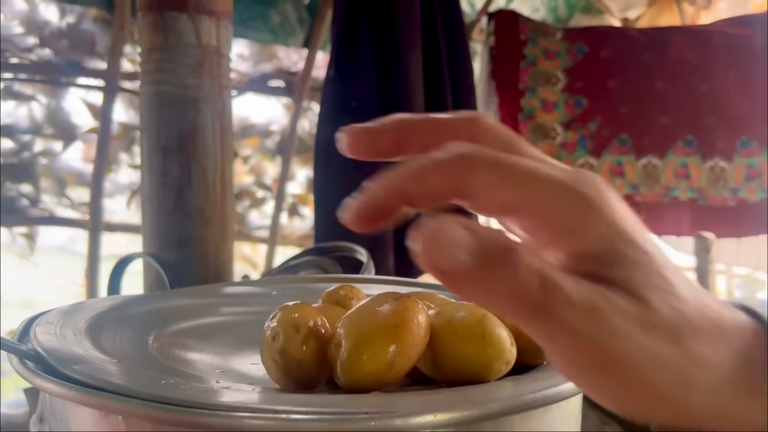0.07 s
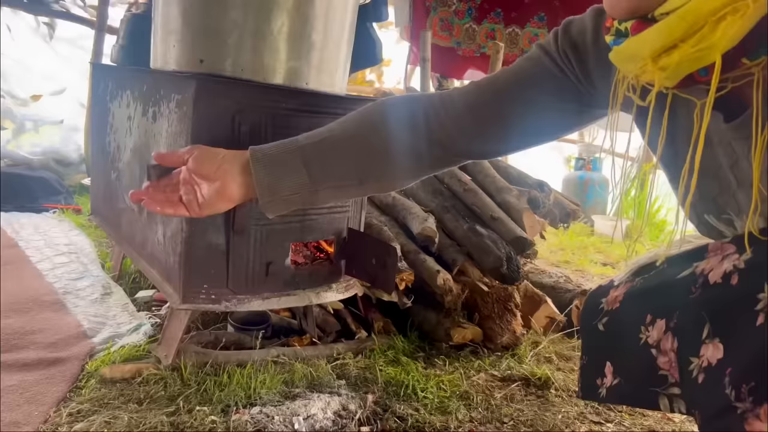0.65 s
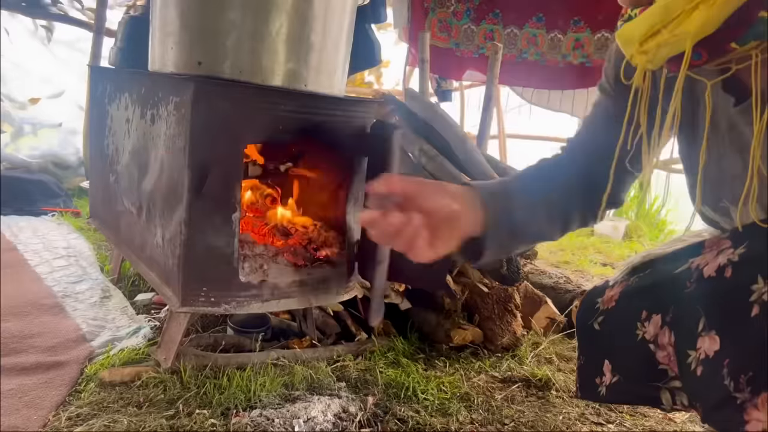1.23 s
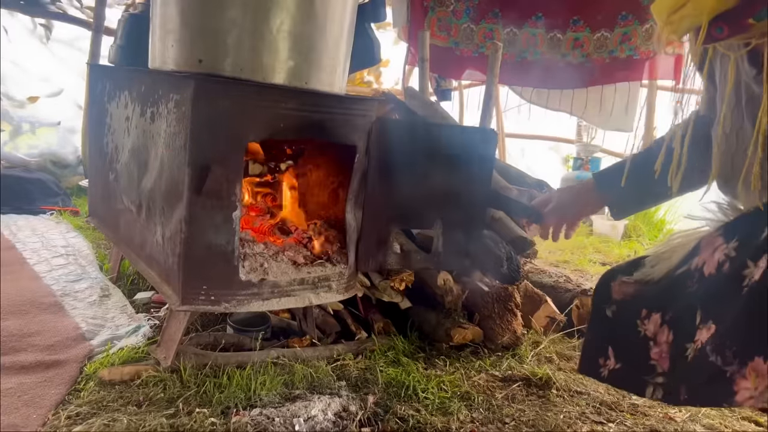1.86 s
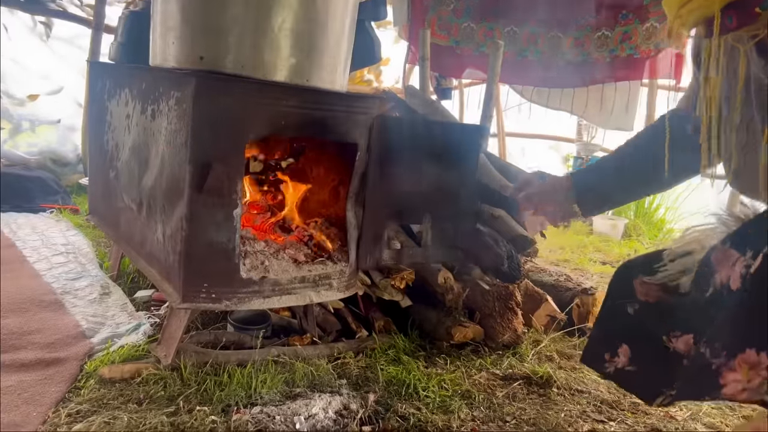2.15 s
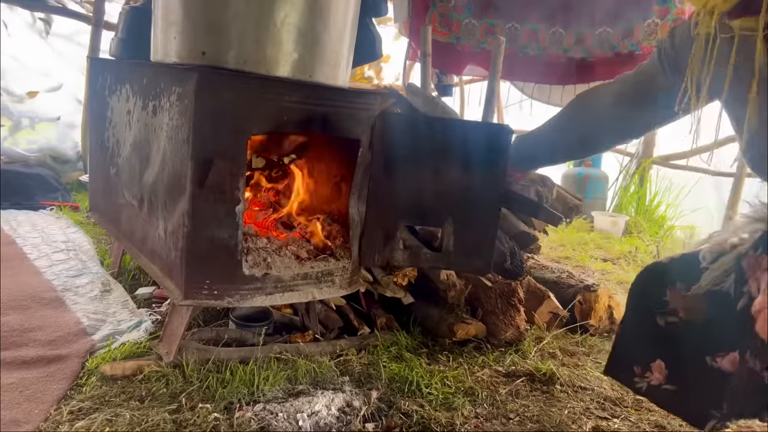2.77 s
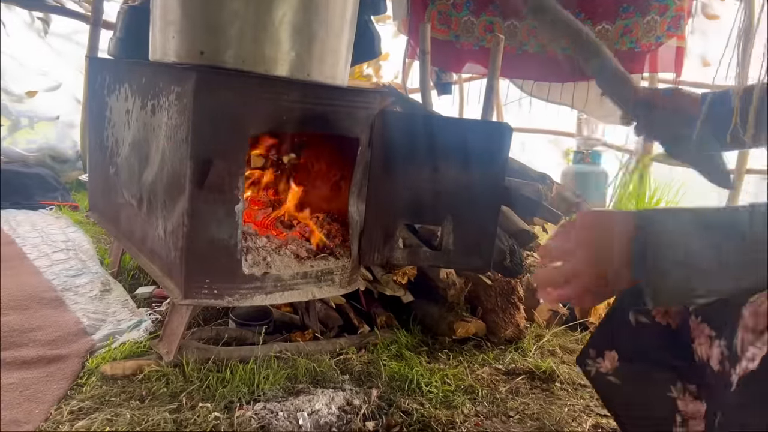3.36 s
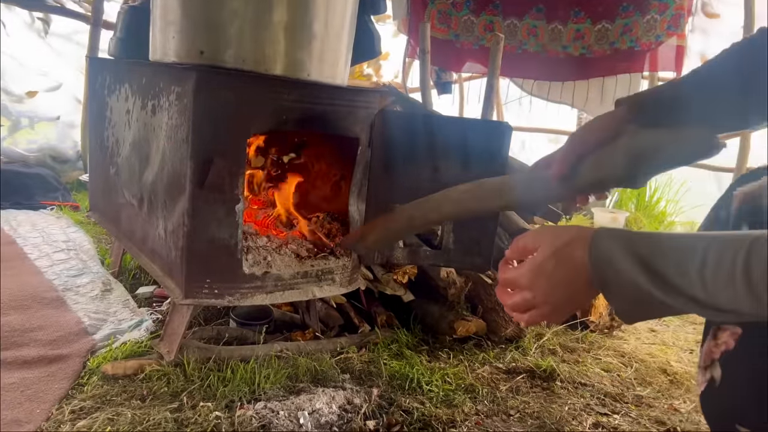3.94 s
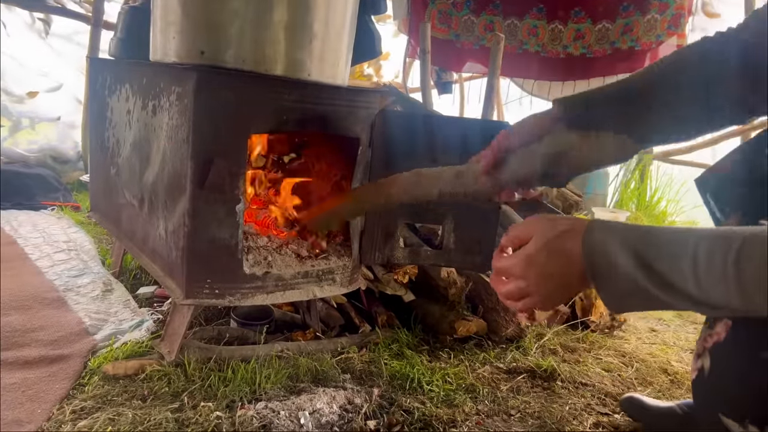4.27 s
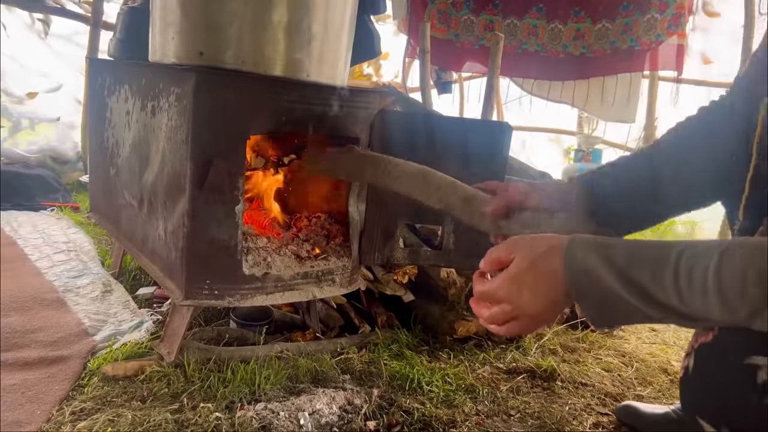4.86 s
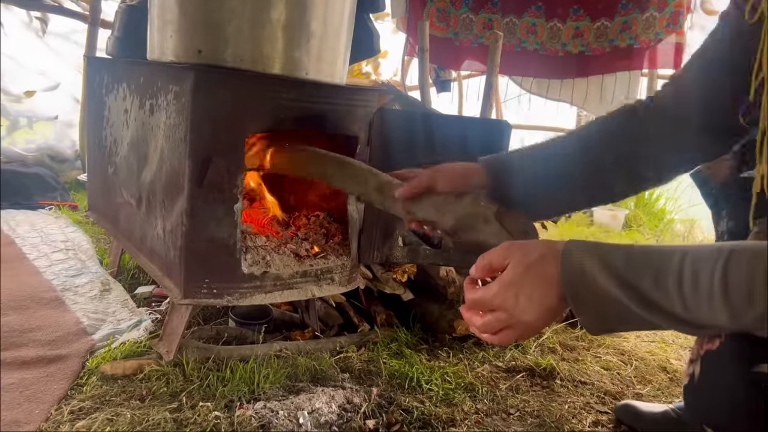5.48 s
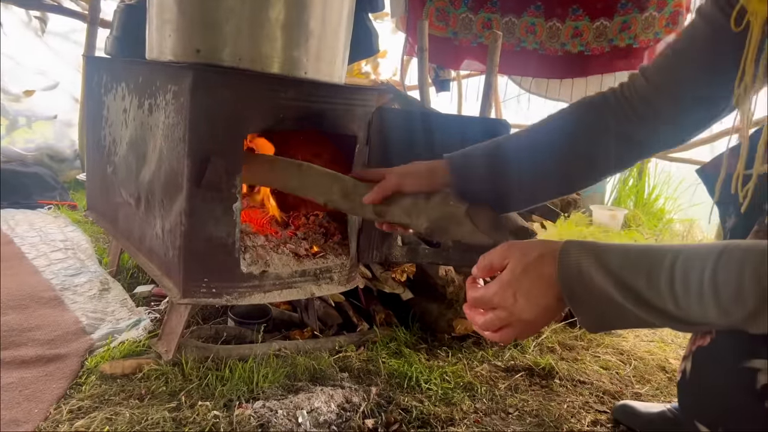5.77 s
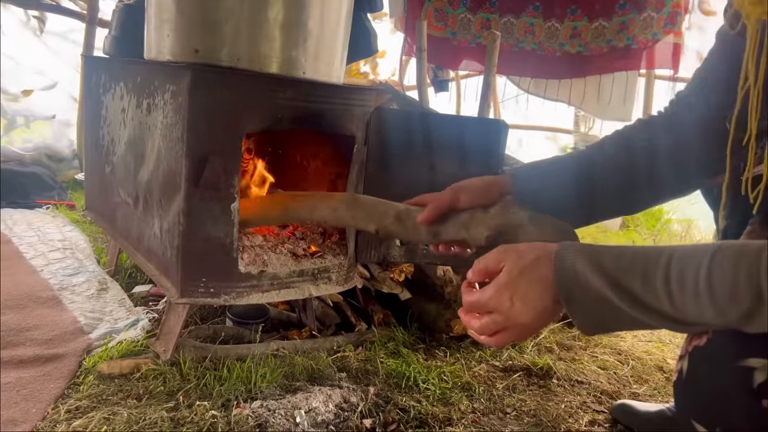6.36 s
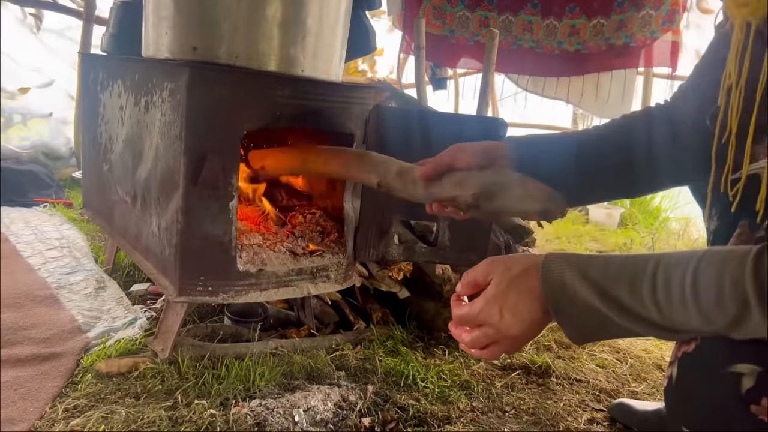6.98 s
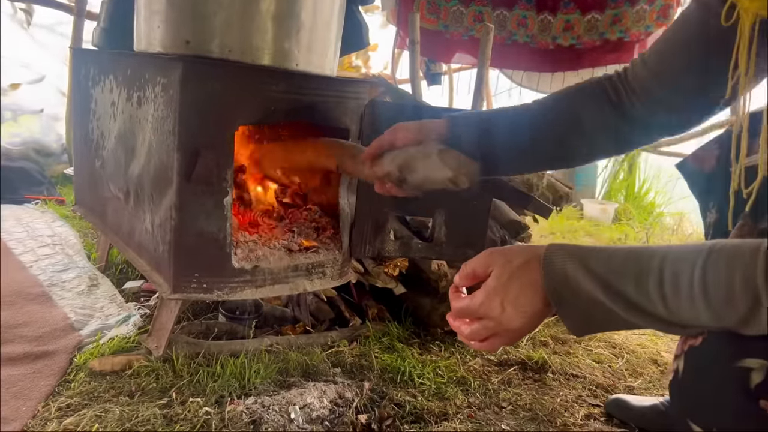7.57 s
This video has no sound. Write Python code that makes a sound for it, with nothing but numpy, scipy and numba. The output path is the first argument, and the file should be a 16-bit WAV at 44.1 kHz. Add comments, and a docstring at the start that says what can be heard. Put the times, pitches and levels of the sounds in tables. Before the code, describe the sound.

Light rain patters on a shelter as a stove door clanks open and firewood is clattered about, then shoved into the rumbling fire.

```python
"""A small wood stove is fed: its sheet-metal door swings open and a stick is picked from the woodpile.
Sticks knock together, then a long one is shoved into the fire: the firebox booms, coals crunch and
bark scrapes. The fire rumbles as it draws air, and its embers tick more once it is poked.
A sleeve swishes with each reach of the arm, and light rain patters on the shelter overhead."""
import sys
import numpy as np
from scipy import signal
from scipy.fft import rfft, irfft, next_fast_len
from scipy.io import wavfile
from numba import njit

SR = 44100
rng = np.random.default_rng(int(sys.argv[2]) if len(sys.argv) > 2 else 0)


def wrap_up_sound(samples):
    """Save the sound to the file named by the first command line argument, as 16-bit audio."""
    columns = np.atleast_2d(samples).T
    # keep every value between -1 and 1, then stretch to whole-number steps
    tamed = np.clip(columns, -1, 1)
    steps = np.round(tamed * 32767).astype(np.int16)
    wavfile.write(sys.argv[1], SR, steps)


N = 336042
TIME = np.arange(N) / SR
RING_TIME = TIME[:SR * 3 // 4]  # the clock for one short sound

# Levels compare rows within a table. A mode is one ringing tone; t60 is its time to fade by 60 dB.
# loudness of the fire drawing air: t/s, level/dB
DRAUGHT_LEVELS = [(0, -47.5), (.7, -47.5), (1.4, -50), (2.2, -53), (3.1, -54), (3.7, -56), (4.4, -52),
                  (6, -47), (6.7, -48), (7.1, -51), (7.62, -49)]
# loudness of the fine crackle, higher once the fire is poked: t/s, level/dB
CRACKLE_LEVELS = [(0, -77), (3.8, -78), (5.3, -65), (6.7, -64), (7.62, -66)]
# sharp ticks of the embers: t/s, level/dB
EMBER_TICKS = [(1.311, -24), (3.87, -33), (4.563, -21.5), (5.285, -30), (5.308, -22.5), (5.319, -23),
               (5.524, -31), (5.558, -40), (5.661, -31), (5.807, -41), (6.103, -30), (6.294, -34),
               (6.44, -27.5), (6.665, -27), (6.797, -18), (7.29, -28), (7.424, -19.5), (7.533, -24)]
# bark being handled: t/s, rubbing level/dB, gritty scraping level/dB
BARK_LEVELS = [(0.0, -57, -73), (0.19, -47.5, -54.5), (0.42, -48, -61), (0.83, -51.5, -72.5),
               (1.21, -57, -67.5), (1.38, -47.5, -58), (1.66, -44.5, -60), (2.01, -51, -69.5),
               (3.2, -54, -66.5), (3.82, -60.5, -70.5), (4.05, -45.5, -59.5), (4.35, -47.5, -59.5),
               (4.86, -47, -60), (5.26, -53.5, -66), (5.39, -55, -64.5), (5.47, -39.5, -51),
               (5.67, -38.5, -55.5), (6.07, -49, -66), (6.79, -39.5, -58.5), (7.0, -78, -79),
               (7.24, -38.5, -58), (7.34, -45, -61), (7.62, -41, -68)]
# one swish for each reach of the arm: fastest t/s, level/dB, speeding up/s, slowing down/s
SLEEVE_SWISHES = [(.06, -39, 0.44, 0.28), (1.29, -52, 0.13, 0.17), (2.98, -56, 0.071, 0.039),
                  (4.37, -40, 0.15, 0.14), (5.56, -49, 0.17, 0.1), (6.75, -57, 0.23, 0.36),
                  (7.27, -44, 0.034, 0.082)]
# short scrapes of wood and iron: t/s, level/dB, length/s, f/Hz
SCRAPE_STROKES = [(0, -36.5, 0.043, 1620), (.22, -52.5, 0.21, 1140), (.68, -63, 0.11, 12000),
                  (.71, -41.5, 0.021, 3580), (.813, -49, 0.037, 5140), (1.19, -46, 0.26, 1430),
                  (1.178, -49.5, 0.14, 5370), (1.172, -57, 0.22, 12500), (1.424, -36, 0.032, 950),
                  (1.601, -49.5, 0.14, 1640), (1.762, -48, 0.052, 2050), (2.635, -44.5, 0.018, 5140),
                  (2.937, -55, 0.079, 5100), (3.16, -41, 0.02, 1080), (3.16, -52, 0.043, 3800),
                  (3.277, -52, 0.074, 2280), (3.331, -45.5, 0.064, 1400), (4.16, -49.5, 0.12, 1820),
                  (4.995, -39.5, 0.058, 810), (5.211, -53.5, 0.13, 1930), (5.405, -39.5, 0.037, 3150),
                  (5.409, -41, 0.03, 1510), (5.405, -52, 0.043, 7500), (5.5, -55, 0.059, 12500),
                  (5.585, -62, 0.057, 12000), (5.652, -36.5, 0.032, 4200), (5.635, -38, 0.07, 740),
                  (5.8, -48.5, 0.097, 2000), (6.042, -48.5, 0.1, 820), (6.407, -46, 0.039, 3200),
                  (6.57, -53, 0.12, 2110), (6.815, -32.5, 0.055, 800), (7.173, -41.5, 0.016, 3170),
                  (7.172, -59, 0.07, 9000), (7.25, -50.5, 0.089, 5300), (7.391, -41.5, 0.014, 4000),
                  (7.43, -26, 0.05, 750)]
# thin squeaks of the hinge and of the stick on the iron rim: t/s, level/dB, length/s, f/Hz
SQUEAK_STROKES = [(.2, -48.5, .2, 2440), (.45, -56, 0.048, 3040), (1.04, -46.5, 0.053, 550),
                  (1.05, -46.5, 0.032, 1150), (1.105, -42.5, 0.039, 1270), (1.136, -47, 0.057, 2120),
                  (1.145, -54, 0.047, 4350), (3.97, -49, 0.09, 2460), (4.165, -52, 0.034, 2600),
                  (4.8, -56.5, 0.27, 2470), (6.935, -54, 0.06, 6300)]
# coals and bark being crushed: t/s, level/dB, swell time/s, treble roll-off f/Hz
COAL_CRUNCHES = [(.01, -35.5, 0.013, 2200), (.675, -47, 0.012, 3520), (0.708, -41, 0.027, 6950),
                 (1.435, -45, 0.018, 4500), (3.865, -36, 0.0078, 4900), (4.495, -34.5, 0.011, 900),
                 (4.689, -38.5, 0.0045, 1990), (4.96, -38, 0.0046, 1760), (5.627, -39, 0.025, 3180),
                 (6.796, -30.5, 0.0036, 6000), (6.792, -33.5, 0.035, 4900), (7.418, -24.5, 0.015, 5040),
                 (7.447, -27.5, 0.019, 5700)]
# splinters snapping and bark ticking: t/s, level/dB, f/Hz
SPLINTER_SNAPS = [(0.026, -21.5, 2500), (0.083, -28, 2170), (0.512, -33, 1114), (0.561, -43, 3570),
                  (0.688, -40, 2260), (.715, -27, 2980), (0.738, -24, 3160), (1.436, -29, 5200),
                  (1.451, -18, 1780), (1.467, -21, 2370), (1.582, -22, 3000), (1.597, -28, 3850),
                  (1.602, -19, 1995), (1.887, -28, 2280), (2.16, -35, 1820), (2.276, -21.5, 2080),
                  (2.292, -26, 1670), (2.303, -35, 5430), (2.389, -35, 2150), (2.477, -32.5, 1580),
                  (2.571, -27.5, 1310), (2.61, -29, 2450), (2.649, -35.5, 4700), (3.011, -27.5, 2190),
                  (3.023, -31.5, 4530), (3.164, -31, 2600), (3.221, -34, 2900), (3.332, -33, 4500),
                  (3.779, -25.5, 3050), (3.827, -28.5, 2230), (3.849, -23, 6000), (3.85, -19.5, 1600),
                  (3.997, -22.5, 3500), (4.033, -29, 3880), (4.18, -25, 2600), (4.2, -25, 2020),
                  (4.651, -38, 2050), (4.697, -16.5, 1640), (4.83, -29, 2920), (4.876, -31, 2440),
                  (4.971, -22, 1740), (5.03, -30, 3270), (5.28, -36, 3540), (5.408, -31, 4150),
                  (5.866, -23, 2330), (5.906, -25.5, 1850), (6.005, -32, 2680), (6.279, -33, 1870),
                  (6.293, -31, 4020), (6.297, -31, 6650), (6.375, -30, 3820), (6.404, -19.5, 2260),
                  (6.425, -26, 2170), (6.504, -27, 2350), (6.585, -35, 3950), (6.625, -25, 2490),
                  (6.719, -34, 3340), (6.739, -22.5, 2140), (6.943, -32, 1650), (7.23, -21, 2250),
                  (7.252, -43, 2950)]
# a stick or the door strikes and rebounds: t/s, level/dB, f/Hz, t60/s, chatter against the blow/dB,
# sheet-metal level/dB, rebound delay/s, rebound against the blow/dB
KNOCK_HITS = [(0.027, -38.5, 522, 0.13, -9, -43, .01, -20), (.239, -41, 401, .15, -7, -65, .015, -14),
              (.993, -37.5, 369.5, 0.26, -18, -44, .044, -9), (1.444, -28, 381, 0.25, -16, -45, .026, 11.5),
              (1.475, -23, 534, 0.094, -8, -52, .003, -12), (1.484, -21, 372, 0.068, -15, -58, .01, -20),
              (1.958, -43.5, 754, 0.11, 5, -67, .006, 1.5), (2.274, -36, 765, 0.051, -7, -44.5, .013, 14),
              (2.29, -30.5, 970, 0.035, -13, -67, .0085, -10), (2.299, -30, 365, .21, -15, -66, .008, -23),
              (2.302, -37.5, 515, 0.15, -18, -68, .009, -18), (2.598, -37.5, 567, 0.11, 3.5, -46, .012, -7),
              (2.645, -38.5, 780, 0.1, 0, -58, .01, -8), (2.772, -24, 915, 0.04, -16, -48.5, .013, -29),
              (2.856, -28.5, 1295, 0.022, -11, -77, .008, -24),
              (3.007, -27.5, 550, 0.13, -8, -38, .0058, 12), (3.019, -30, 1334, .04, -14, -49, .008, -12),
              (3.494, -27, 800, 0.053, -22, -45.5, .01, -30), (3.846, -33, 803, .056, -5, -44.5, .011, 3),
              (3.865, -24.5, 528, 0.15, -7.5, -35.5, .012, 9),
              (3.952, -21.5, 1170, 0.022, -10, -64, .022, -3), (4.486, -34, 373, 0.055, 10, -32, .004, 0),
              (4.676, -29, 487, 0.076, -10, -38.5, .022, 8.5),
              (4.697, -34, 776, 0.077, -17, -52, .008, -13), (4.967, -25, 397, 0.12, -2, -36.5, .004, -15),
              (5.206, -26.5, 1470, 0.017, -7, -49.5, .0105, -21), (5.52, -44, 520, .12, -6.5, -36, .017, 9),
              (5.632, -25.5, 744, .08, -9, -36.5, .01, -1), (6.373, -37.5, 720, 0.026, -8, -38, .032, 13),
              (6.404, -30, 744, 0.038, -5, -38, .009, 5), (6.441, -26.5, 356, 0.1, -19, -47, .02, -27),
              (6.797, -24.5, 307, .09, 5, -29, .031, -5), (7.201, -22, 1210, 0.021, -16, -48.5, .025, -10),
              (7.227, -42.5, 596, 0.05, -9, -39, .02, 16), (7.32, -35, 447, 0.17, -10, -68, .0076, -15),
              (7.419, -15, 340, 0.081, 0, -27.5, .006, 3), (7.433, -14, 727, 0.038, -1, -31.5, .016, -9),
              (7.464, -20, 850, .043, -5, -27.5, .012, 2)]
# the long stick shuddering in the firebox: t/s, level/dB, f/Hz, swell time/s, boom against shudder/dB
STICK_SHOVES = [(4.378, -28.5, 143.3, 0.027, -11), (4.451, -29.5, 112, 0.0073, -12),
                (4.497, -11, 124, 0.0088, -21.5), (4.525, -18.5, 120, 0.0064, -25),
                (4.582, -30.5, 137, .014, -24), (4.628, -32, 115, 0.028, -14),
                (4.976, -18, 130, 0.011, -19.5), (5.408, -24.5, 109.5, .014, -12.5),
                (5.511, -28.5, 129, 0.013, -11), (5.627, -11.5, 130, 0.0028, -29),
                (5.636, -4.5, 91.3, 0.012, -15), (5.685, -22, 97.7, 0.024, -12),
                (5.778, -25, 130, 0.011, -3.5), (6.314, -28.5, 93.5, 0.012, -29),
                (6.426, -36.5, 145, .02, -6), (6.542, -20.5, 137.4, .021, -13),
                (6.655, -24.5, 139, 0.013, -15), (6.81, -1.5, 108, 0.0086, -17.5),
                (6.845, -10.5, 131, 0.0074, -22), (6.933, -17.5, 86, 0.011, -13.5),
                (7.214, -22, 125, 0.014, -13.5), (7.302, -19.5, 144, 0.019, -15),
                (7.429, -4, 145, 0.0063, -18)]
# the stick juddering along the rim of the opening: t/s, level/dB, length/s, f/Hz
RIM_JUDDERS = [(5.412, -48.5, 0.047, 436), (5.515, -31.5, 0.031, 522), (5.561, -34.5, 0.035, 374),
               (5.645, -30.5, 0.11, 354), (5.675, -43, 0.029, 824), (5.745, -41, 0.089, 355),
               (5.79, -33, .04, 487)]

# tone of the flames' rumble: f/Hz, level/dB
DRAUGHT_SPECTRUM = [(20, -53), (38, -6), (55, 2), (80, 0), (115, 4.5), (170, -3.5), (260, -23), (500, -43)]
# tone of the raindrops: f/Hz, level/dB
RAIN_SPECTRUM = [(200, 6), (380, 18), (800, 47), (1800, 33), (3500, -21), (6300, 7), (9000, -31),
                 (16000, -44)]
# tone of the fine crackle: f/Hz, level/dB
CRACKLE_SPECTRUM = [(1800, 19), (3000, 31), (6500, -15), (9000, -8), (15500, -15)]
# tone of rubbed bark: f/Hz, level/dB
RUB_SPECTRUM = [(200, -0.5), (370, 9), (520, 1.5), (800, 1), (1500, -5), (2400, -5.5), (4000, -22.5)]
# tone of gritty scraping: f/Hz, level/dB
GRIT_SPECTRUM = [(1500, -1), (2600, 4.5), (4400, 4.5), (6300, 15.5), (8000, 1), (11000, -40)]
# tone of dry splinters: f/Hz, level/dB
SPLINTER_SPECTRUM = [(900, -10), (1500, 17), (2300, 10), (3200, 11), (4500, 0), (7000, 3)]
# tone of sliding cloth: f/Hz, level/dB
SLEEVE_SPECTRUM = [(1500, 1.5), (4000, 10.3), (8000, 11.4), (12000, 15), (16000, 16.8)]
# tone of breaking coals: f/Hz, level/dB
COAL_SPECTRUM = [(250, -6), (400, 8.5), (800, 4), (1700, 4.5), (3500, -7.5), (6300, 6.5), (9000, -5.5),
                 (12000, -22), (16000, 16)]

# modes of a snapping splinter: multiple of its pitch, level/dB
SPLINTER_MODES = [(1, -1), (1.17, -11), (1.45, -11)]
# bending modes of a stick: multiple of its pitch, level/dB
STICK_MODES = [(1.001, 6), (1.08, -27), (1.5, -14.5), (2.1, -18.5)]
# modes of the stove's sheet metal and door: f/Hz, level/dB, t60/s
SHEET_MODES = [(302, 8, 0.054), (352, 5, 0.56), (405, 6.5, 0.32), (466.6, 4.5, 0.4), (521, 0, 0.16),
               (544, 12.5, 0.1), (690, 4, 0.029), (768, 4.5, 0.4), (818, 13.5, 0.054), (963, -23, 0.11),
               (1204, 8, 0.15), (1510, -2, 0.12), (1830, -5, 0.12)]
# modes of the whole firebox: f/Hz, level/dB, t60/s
FIREBOX_MODES = [(59.8, 8.5, 0.36), (99, 5, 0.33), (128, 6.5, 0.34), (174, -1, 0.26), (243, -11.5, 0.13),
                 (272, -8, 0.17)]
# hollow modes of stick and rim pressed together: multiple of the pitch, level/dB, t60/s
HOLLOW_MODES = [(.76, -7.5, 0.036), (1, 0, 0.097), (1.5, -15, .1), (2.3, -22, 0.052)]


def undb(db):
    """Turn decibels into a gain to multiply by."""
    return 10 ** (np.asarray(db) / 20)


def unit(x):
    """Scale a sound to an average strength (rms) of 1."""
    return x / np.sqrt(np.mean(x ** 2))


def fade(t60, t=RING_TIME):
    """A gain that falls by 60 dB every t60 seconds."""
    return np.exp(-np.log(1000) * t / t60)


def rise(rise_s):
    """A gain that climbs from 0 towards 1."""
    return 1 - np.exp(-RING_TIME / rise_s)


def swell(peak_s, steepness):
    """A push that builds to 1 at peak_s and dies away."""
    progress = RING_TIME / peak_s
    return (progress * np.exp(1 - progress)) ** steepness


def waver(per_second, depth_db):
    """A gain that wanders at random."""
    steps = rng.standard_normal(N // 50)
    return undb(depth_db * np.interp(TIME * per_second, np.arange(len(steps)), steps))


def curves(rows):
    """A gain over time for each dB column of a table."""
    times, *columns = np.transpose(rows)
    return [undb(np.interp(TIME, times, db)) for db in columns]


def gain_at(spectrum, hz):
    """The gain of a spectrum at the given frequencies."""
    points, db = np.transpose(spectrum)
    return undb(np.interp(np.log(hz + 1), np.log(points), db))


def noise(spectrum):
    """Smooth noise with the given spectrum."""
    size = next_fast_len(N)
    gains = gain_at(spectrum, np.fft.rfftfreq(size, 1 / SR))
    return unit(irfft(rfft(rng.standard_normal(size)) * gains, size)[:N])


def resonate(x, hz, q):
    """Keep the sound near one pitch; a higher q makes the band narrower."""
    return signal.lfilter(*signal.iirpeak(hz, q, fs=SR), x)


def ring(modes, detune=0.0086):
    """Modes ring freely; each blow lands on a new spot, changing their strength and pitch a little."""
    out = 0
    for hz, db, t60 in modes:
        weight = undb(db + 2 * rng.standard_normal()) * rng.choice([-1, 1])
        pitch = hz * (1 + detune * rng.standard_normal())
        out = out + weight * np.sin(2 * np.pi * pitch * RING_TIME) * fade(t60)
    return out


def rasp(hz, q, slips_per_s=2400, spread_db=4):
    """Many tiny, uneven slips make a rough sound around one pitch."""
    size = len(RING_TIME)
    strengths = rng.standard_normal(size) * undb(spread_db * rng.standard_normal(size))
    slips = strengths * (rng.random(size) < slips_per_s / SR)
    return unit(resonate(resonate(slips, hz, q), hz, q))


@njit
def grains(starts, pitches, sizes, q, length):
    """Each impact rings out as a fading tone at its own pitch."""
    out = np.zeros(length)
    for k in range(len(starts)):
        decay = np.pi * pitches[k] / (q * SR)
        turn = np.exp(-decay + 2j * np.pi * pitches[k] / SR)  # moves the tone on by one sample
        tone = sizes[k] + 0j
        out[starts[k]] += tone.real / 2
        for i in range(starts[k] + 1, min(starts[k] + int(5 / decay), length)):
            tone *= turn
            out[i] += tone.real
    return out


def patter(spectrum, per_second, spread_db, q):
    """Tiny impacts at random times, uneven in size and pitch."""
    sizes = undb(spread_db * np.minimum(rng.exponential(size=N), 4)) * rng.choice([-1, 1], N)
    starts = np.flatnonzero(rng.random(N) < per_second / SR)
    low_hz, high_hz = spectrum[0][0], spectrum[-1][0]
    hz = low_hz * (high_hz / low_hz) ** rng.random(N)[starts]
    return unit(grains(starts, hz, sizes[starts] * gain_at(spectrum, hz) * hz, float(q), N))


def add(track, s, sound):
    """Mix a sound into a track, starting at s seconds."""
    start = int(s * SR)
    track[start:start + len(sound)] += sound[:N - start]


def place(x, right_db, echo_db, t60=0.21, echo_top_hz=6500):
    """Stereo: sound reaches the right side later, and echoes off stove, ground and roof."""
    right = undb(right_db) * np.pad(x, (11, 0))[:N]  # 11 samples late
    t = TIME[:SR // 5]
    tail = fade(t60, t) * (t > .003)
    tail /= np.sqrt(np.sum(tail ** 2))
    hop = int(.06 * SR)  # the echo keeps changing as things move
    window = np.sin(np.pi * np.arange(2 * hop) / (2 * hop))
    echo = np.zeros((2, N))
    for start in range(0, N, hop):
        piece = x[start:start + 2 * hop]
        for side in echo:
            reflections = tail * rng.standard_normal(len(t))
            add(side, start / SR, signal.fftconvolve(piece * window[:len(piece)], reflections))
    echo = signal.sosfilt(signal.butter(3, [250, echo_top_hz], "band", fs=SR, output="sos"), echo)
    return np.array([x, right]) + undb([[echo_db], [echo_db + right_db]]) * echo


def draught():
    """The flames draw air with a low, fluttering rumble."""
    flutter = waver(per_second=11, depth_db=2.6)
    rumble = curves(DRAUGHT_LEVELS)[0] * flutter * noise(DRAUGHT_SPECTRUM)
    return place(rumble, right_db=1, echo_db=8.5)


def rain():
    """Fine drops patter all over the shelter, different ones on each side."""
    sides = []
    for db in (-63.5, -67.5):  # left, right
        drops = patter(RAIN_SPECTRUM, per_second=2000, spread_db=4.5, q=12)
        sides.append(undb(db) * drops * waver(per_second=5, depth_db=1.2))
    return np.array(sides)


def embers(tick_hz=14000, decay_s=0.00054):
    """Glowing wood ticks sharply over a sparse, fine crackle."""
    out = curves(CRACKLE_LEVELS)[0] * patter(CRACKLE_SPECTRUM, per_second=45, spread_db=3.5, q=4)
    for s, db in EMBER_TICKS:
        hiss = unit(resonate(rng.standard_normal(len(RING_TIME)), tick_hz, q=1))
        add(out, s, undb(db) * hiss * np.exp(-RING_TIME / decay_s) / 2)
    return place(out, right_db=-.5, echo_db=-3, t60=.14, echo_top_hz=15000)


def bark(settle_db=-44, settle_s=0.25):
    """Bark catches and slips in small grains, sheds dry splinters and settles after each shove."""
    rub, grit = curves(BARK_LEVELS)
    settling = np.zeros(N)
    for s, db, *_ in STICK_SHOVES:
        add(settling, s, undb(db + settle_db) * np.exp(-RING_TIME / settle_s))
    rubbing = undb(-7.5) * patter(RUB_SPECTRUM, per_second=1500, spread_db=3, q=16.4)
    scraping = undb(1) * patter(GRIT_SPECTRUM, per_second=3000, spread_db=-3, q=6)
    ticks = undb(-14) * patter(SPLINTER_SPECTRUM, per_second=70, spread_db=2.5, q=10)
    grip = waver(per_second=45, depth_db=2.5)
    friction = grip * (np.hypot(rub, settling) * rubbing + grit * scraping)
    splinters = np.sqrt(rub * grit) * ticks
    return place(friction + splinters, right_db=-4.5, echo_db=8, t60=0.049)


def sleeve():
    """Cloth swishes louder as the arm speeds up and fades as it slows."""
    speed = np.zeros(N)
    for s, db, rise_s, fall_s in SLEEVE_SWISHES:
        from_peak = np.maximum((s - TIME) / rise_s, (TIME - s) / fall_s)
        speed += undb(db) * np.exp(-from_peak ** 1.4)
    return place(speed * undb(-6) * noise(SLEEVE_SPECTRUM), right_db=0.5, echo_db=-4.5)


def rubs(strokes, q, grip_s=0.009):
    """A surface grips, rasps along and slows to a stop; a low q scrapes, a high q squeaks."""
    out = np.zeros(N)
    for s, db, length_s, hz in strokes:
        speed = rise(grip_s) * np.clip(1 - (RING_TIME / length_s) ** 3, 0, 1)
        add(out, s, undb(db) * speed * rasp(hz, q))
    return place(out, right_db=-3, echo_db=1)


def crunches():
    """Coals and bark give way in a burst of tiny fractures."""
    out = np.zeros(N)
    fractures = patter(COAL_SPECTRUM, per_second=21000, spread_db=3.5, q=7)
    for s, db, peak_s, bright_hz in COAL_CRUNCHES:
        burst = np.roll(fractures, -int(s * SR))[:len(RING_TIME)]
        softened = signal.lfilter(*signal.butter(1, bright_hz, fs=SR), burst)
        add(out, s, undb(db) * swell(peak_s, steepness=8.6) * unit(softened))
    return place(out, right_db=-6, echo_db=9)


def snaps(cycles=42, burst_db=-5, burst_s=0.0042):
    """A splinter breaks with a burst and rings for a few dozen cycles."""
    out = np.zeros(N)
    for s, db, hz in SPLINTER_SNAPS:
        tone = ring([(hz * k, mode_db, cycles / hz) for k, mode_db in SPLINTER_MODES], detune=0.0061)
        burst = undb(burst_db) * rasp(hz, q=4, slips_per_s=12000) * np.exp(-RING_TIME / burst_s)
        add(out, s, undb(db) * (tone + burst) * rise(0.00028) / 2)
    return place(out, right_db=-7.5, echo_db=-5.5, t60=0.12)


def stick_blow(hz, t60, chatter_db, contact_s=0.0058, chatter_s=0.0041):
    """A struck stick rings while its bark chatters where it was hit."""
    stick = ring([(hz * k, mode_db, t60 / np.sqrt(k)) for k, mode_db in STICK_MODES])
    chatter = rasp(hz, q=1.7) * np.exp(-RING_TIME / chatter_s)
    return stick * rise(contact_s) + undb(chatter_db) * chatter


def sheet_metal():
    """Sheet metal rings with a few clear tones amid the rattle of its loose seams."""
    rattle = undb(-4.5) * rasp(hz=760, q=1) * fade(t60=0.11)
    tones = undb(-13.5) * ring(SHEET_MODES, detune=0.011)
    return (tones + rattle) * rise(0.0005)


def knocks(in_fire_s=4.4, rebound_cycles=25):
    """Each blow rings a stick and the stove's metal, then rebounds; in the firebox it echoes longer."""
    outside, inside = np.zeros((2, N))
    for s, db, hz, t60, chatter_db, metal_db, after_s, rebound_db in KNOCK_HITS:
        out = inside if s > in_fire_s else outside
        blow = undb(db) * stick_blow(hz, t60, chatter_db)
        add(out, s, blow + undb(metal_db) * sheet_metal())
        clack_hz = 2.126 * hz  # the rebound wakes a higher bending mode
        clack = undb(db + rebound_db) * stick_blow(clack_hz, rebound_cycles / clack_hz, chatter_db)
        add(out, s + after_s, clack + undb(metal_db) * sheet_metal())
    return (place(outside, right_db=-6, echo_db=-5, t60=0.19)
            + place(inside, right_db=-4, echo_db=-4, t60=0.3))


def shoves(boom_lag_s=0.012):
    """The stick jams in the fire and shudders for a few cycles; the firebox booms on after it."""
    out = np.zeros(N)
    for s, db, hz, peak_s, boom_db in STICK_SHOVES:
        shudder = swell(peak_s, steepness=2.3) * np.sin(2 * np.pi * hz * RING_TIME)
        build_up = 1 - np.exp(-(RING_TIME / (peak_s + boom_lag_s)) ** 2)
        boom = undb(boom_db) * ring(FIREBOX_MODES) * build_up
        add(out, s, undb(db) * (shudder + boom))
    return place(out, right_db=-1.5, echo_db=10)


def judders(slips_per_s=74, unevenness=.3, spread_db=2.5):
    """The stick catches and slips on the rim in quick, uneven jerks, each with a hollow ring."""
    out = np.zeros(N)
    for s, db, length_s, hz in RIM_JUDDERS:
        gaps, strengths = rng.standard_normal((2, 16))
        times = np.cumsum(np.exp(unevenness * gaps)) / slips_per_s
        hollow = ring([(hz * k, mode_db, t60) for k, mode_db, t60 in HOLLOW_MODES])
        slide = np.zeros(N)
        for after_s, strength in zip(times - times[0], strengths):
            if after_s < length_s:
                add(slide, s + after_s, undb(spread_db * strength) * hollow)
        slide_rms = np.sqrt(np.sum(slide ** 2) / (length_s * SR))
        out += undb(db) * slide / slide_rms
    return place(out, right_db=-6.5, echo_db=-5.5)


def scene():
    """Add up all the sounds around the stove."""
    friction = rubs(SCRAPE_STROKES, q=1) + rubs(SQUEAK_STROKES, q=7.5) + judders() + bark() + sleeve()
    return knocks() + shoves() + crunches() + snaps() + friction + embers() + draught() + rain()


def record(dry, low_cut_hz=41, ceiling=.97, top_hz=15700):
    """Drop the deepest bass, round off the loudest peaks and cut the highest treble."""
    thinned = signal.sosfilt(signal.butter(4, low_cut_hz, "high", fs=SR, output="sos"), dry)
    rounded = thinned / (1 + (thinned / ceiling) ** 6) ** (1 / 6)
    return signal.sosfilt(signal.ellip(10, .2, 80, top_hz, fs=SR, output="sos"), rounded)


dry = scene()
out = record(dry)
wrap_up_sound(out)
```